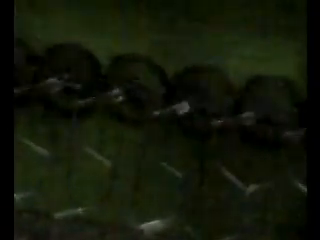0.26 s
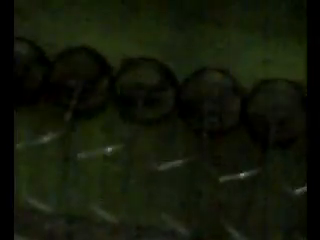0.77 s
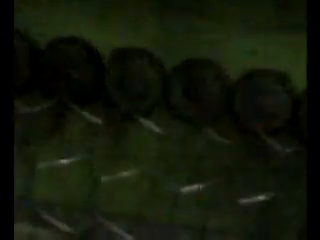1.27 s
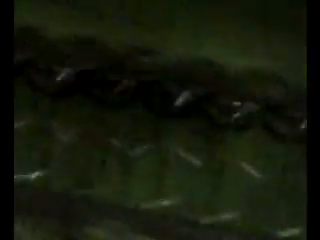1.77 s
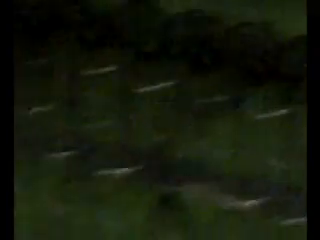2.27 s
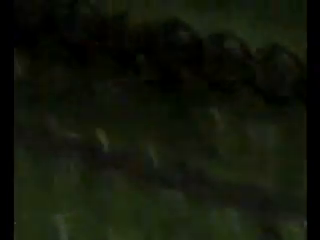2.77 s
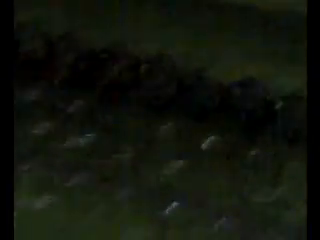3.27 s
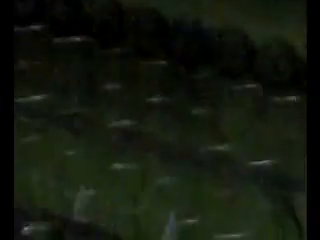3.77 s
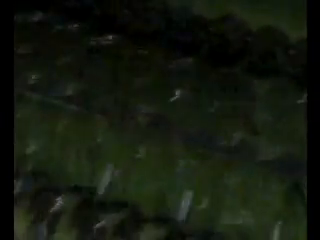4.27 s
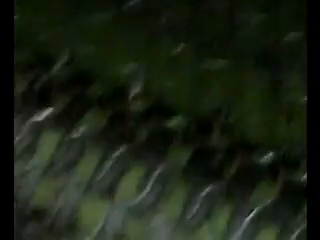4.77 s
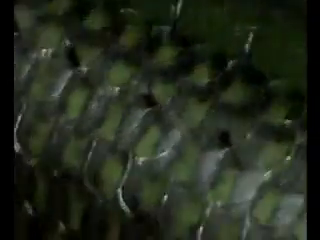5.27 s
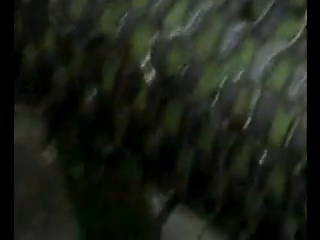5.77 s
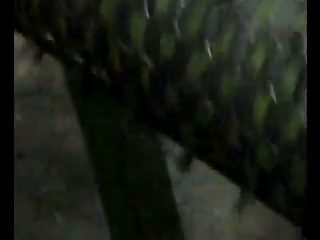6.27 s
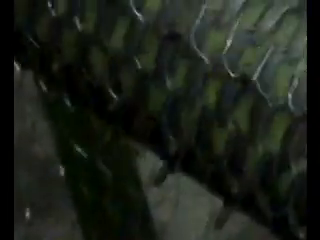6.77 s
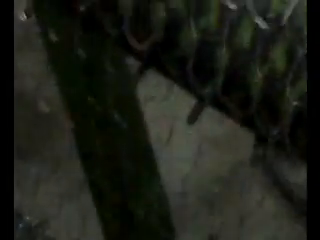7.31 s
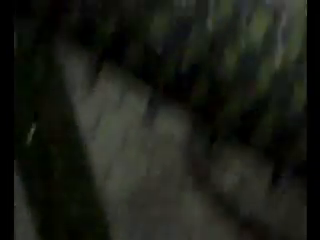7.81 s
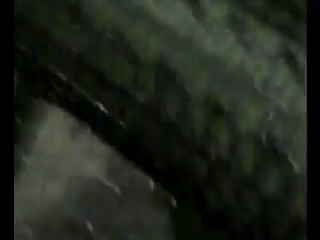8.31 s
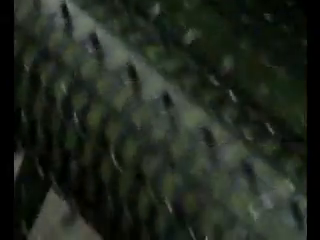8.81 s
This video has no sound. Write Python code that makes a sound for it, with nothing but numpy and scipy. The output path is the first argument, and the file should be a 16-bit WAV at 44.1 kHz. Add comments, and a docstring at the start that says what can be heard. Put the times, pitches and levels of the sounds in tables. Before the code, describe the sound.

Wire coils rattle steadily in steel tubes as a mesh-making machine clanks, rumbles and snaps in a regular cycle.

```python
"""A factory hall, close to a wire netting machine, heard through a small mono microphone.
Hundreds of wire coils rattle in their steel tubes, and thin wires tick against their guides.
About every 0.8 s the twisting racks clank against their stop, the slide bars rumble across,
and the fresh mesh snaps off its pegs. Underneath, the shaft hums and the gears whine.
The rattle and the blows echo briefly in the hall."""
import sys
import numpy as np
from scipy import signal
from scipy.fft import rfft, irfft, next_fast_len
from scipy.io import wavfile
from scipy.ndimage import uniform_filter1d

SR = 44100
rng = np.random.default_rng(int(sys.argv[2]) if len(sys.argv) > 2 else 0)


def digitize_waveform(pressure):
    """Quantize a signal to 16-bit integers and store it at the path in sys.argv[1].

    Rows of a 2-D input are taken as channels; values are limited to [-1, 1].
    """
    field = np.atleast_2d(pressure).T
    bounded = np.clip(field, -1, 1)
    quanta = np.round(bounded * 32767).astype(np.int16)
    wavfile.write(sys.argv[1], SR, quanta)


N = 399105
TIME = np.arange(N) / SR


def gain_of(db):
    """Turns decibels into a number to multiply by."""
    return 10 ** (np.asarray(db) / 20)


def unit_rms(x):
    """Scales a signal to an average power of 1."""
    return x / np.sqrt(np.mean(x ** 2) + 1e-20)


def value_at(points, hz):
    """Looks up a value between (Hz, value) rows, on a logarithmic pitch scale."""
    row_hz, value = np.transpose(points)
    return np.interp(np.log(hz + 1), np.log(row_hz + 1), value)


def level_curve(rows, column):
    """Turns one dB column of a timed table into a gain for every sample."""
    rows = np.asarray(rows)
    return gain_of(np.interp(TIME, rows[:, 0], rows[:, column]))


def add(mix, start_s, sound):
    """Mixes a sound in, cutting off whatever falls outside the mix."""
    start = round(start_s * SR)
    sound = sound[max(-start, 0):]
    part = mix[max(start, 0):][:len(sound)]
    part += sound[:len(part)]


def colour(x, spectrum):
    """Makes some pitches stronger and others weaker; the result has power 1."""
    size = next_fast_len(len(x))
    gains = gain_of(value_at(spectrum, np.fft.rfftfreq(size, 1 / SR)))
    return unit_rms(irfft(rfft(x, size) * gains, size)[:len(x)])


def ring(x, hz, width_hz):
    """Lets x set one note ringing; a narrower width rings longer."""
    r = np.exp(-np.pi * abs(width_hz) / SR)
    feedback = [1, -2 * r * np.cos(2 * np.pi * hz / SR), r * r]
    return np.sqrt((1 - r * r) / 2) * signal.lfilter([1, 0, -1], feedback, x)


def contacts(length, per_s, spread_db):
    """Clicks of random size and sign at random moments, with power 1."""
    size = gain_of(spread_db * np.clip(rng.standard_normal(length), -2, 2))
    sign = rng.choice([-1, 1], length)
    return unit_rms(size * sign * (rng.random(length) < per_s / SR))


def ticks(low_hz, high_hz, spread_db, width_hz, count):
    """Small steel parts are tapped at random; each rings briefly at its own pitch."""
    when, pitch, force, phase = rng.random((count, 4)).T[:, :, None]
    age = np.arange(SR // 160)
    hz = low_hz + (high_hz - low_hz) * pitch
    waves = np.sin((2 * np.pi * (hz * age / SR + phase)).astype(np.float32))
    rings = gain_of(spread_db * force) * waves * np.exp(-np.pi * width_hz * age / SR)
    positions = (when * N).astype(int) + age
    return np.bincount(positions.ravel(), rings.ravel())[:N]


def tone(hz, width_hz, length):
    """A held note with power 1; more width makes it less steady."""
    drift = np.sqrt(2 * np.pi * abs(width_hz) / SR) * rng.standard_normal(length)
    return np.sqrt(2) * np.sin(np.cumsum(2 * np.pi * hz / SR + uniform_filter1d(drift, size=600)))


def waver(depth_db, rate_hz):
    """A gain that drifts at random, up to rate_hz times a second."""
    t = np.arange(0, N / SR + .01, .005)
    rates = rate_hz * np.geomspace(1 / 10, 1, num=20)
    drift = sum(np.sin(2 * np.pi * (hz * t + rng.random())) for hz in rates)
    return gain_of(depth_db * np.interp(TIME, t, unit_rms(drift)))


def swell(t, peak_s):
    """Rises to 1 at peak_s, then dies away."""
    return t / peak_s * np.exp(1 - t / peak_s)


# The microphone wanders along the machine.
# Each row: time in seconds, level of the tubes in dB, level of the thin wires in dB.
NEARNESS = [(0.0, -16.5, -21.5), (0.7, -18, -22.5), (1.55, -18, -23), (2.1, -16.5, -21.5),
            (2.9, -16, -19.5), (3.7, -17.5, -23), (4.6, -16.5, -21), (5.7, -17.5, -22), (6.7, -16.5, -20),
            (7.3, -17, -22), (7.6, -14, -17), (8.2, -14, -19), (9.05, -14, -18)]
# The tone colour of the tubes. Each row: pitch in Hz, strength in dB.
TUBE_COLOUR = [(300, -19), (550, -9), (700, -6), (950, -4), (1450, -3.5), (1850, -3.5), (2250, -4),
               (2500, -3.5), (3000, -9), (4000, -11), (6000, -23)]
# The notes the tubes share. Each row: pitch in Hz, width in Hz, level in dB.
TUBE_NOTES = [(1685, 30, -18), (1642, 47, -19), (1755, 70, -21.5), (1986, 160, -13.5)]


def tube_rattle(clatter_db=-3, notes_db=-1):
    """Coils knock inside their steel tubes, which ring at a few strong notes."""
    taps = colour(ticks(307, 3772, spread_db=2.5, width_hz=146, count=52000), TUBE_COLOUR)
    notes = sum(gain_of(db) * unit_rms(ring(taps, hz, width)) for hz, width, db in TUBE_NOTES)
    clatter = gain_of(clatter_db) * unit_rms(taps + gain_of(notes_db) * notes)
    return level_curve(NEARNESS, 1) * shaking(clank_db=1.4, slide_share=0.54, snap_db=-0.2) * clatter


# The bright tone colour of thin wire. Each row: pitch in Hz, strength in dB.
WIRE_COLOUR = [(1500, -19.5), (2600, 2.5), (3300, 1), (3800, 1.5), (4400, 3.5), (5000, 1.5), (5600, 0),
               (6000, -2), (6400, -3.5), (6700, -15), (7000, -33.5)]


def wire_ticks(wire_db=-3, click_db=-9):
    """Thin wires tick against the guides; where they cross, they click sharply."""
    taps = colour(ticks(2136, 6900, spread_db=1.5, width_hz=370, count=44000), WIRE_COLOUR)
    clicks = colour(contacts(N, per_s=1500, spread_db=1.5), WIRE_COLOUR)
    ticking = gain_of(wire_db) * unit_rms(taps + gain_of(click_db) * clicks)
    return level_curve(NEARNESS, 2) * shaking(clank_db=0.6, slide_share=0.7, snap_db=1.5) * ticking


def shaking(clank_db, slide_share, snap_db):
    """How hard the wire shakes: it changes briefly at each clank and snap, and while the bars slide."""
    change_db, t = np.zeros(N), np.arange(SR) / SR
    for start, *_ in RACK_CLANKS:
        add(change_db, start, clank_db * swell(t, peak_s=0.05))
    for start, _, _, shake_db, travel_s, *_ in BAR_SLIDES:
        add(change_db, start, slide_share * shake_db * slide_load(t, travel_s))
    for start, *_ in MESH_SNAPS:
        add(change_db, start, snap_db * swell(t, peak_s=0.023))
    return gain_of(change_db)


# The racks hit their stop. Each row: start in seconds, level of the gears in dB, ringing pitch in Hz,
# time the gears take to land in seconds, then five levels in dB: first blow, wire jangle,
# ringing bar, hollow note of the stop (added to stop_base_db), after-rattle.
RACK_CLANKS = [(0.305, -8.5, 1944, 0.026, -8.5, -31.5, -29.5, -13, -29),
               (1.090, -10, 1936, 0.015, -0.5, -21.5, -26.5, -17.5, -25),
               (1.893, -12, 1987, .033, -5.5, -32.5, -28, -11.5, -30),
               (2.685, -11, 1980, .024, -1, -21, -19, -18.5, -26.5),
               (3.488, -11, 2005, 0.053, -9, -29, -29, -8.5, -34),
               (4.281, -16.5, 1890, 0.042, -9, -21, -24.5, -13, -22.5),
               (5.079, -12.5, 2030, 0.037, -11, -26, -25.5, -18, -31.5),
               (5.864, -11.5, 1950, 0.044, -6.5, -24, -27.5, -14, -23.5),
               (6.665, -13.5, 2035, 0.041, -7.5, -26.5, -22.5, -21, -28),
               (7.455, -14.5, 2030, .04, -6.5, -18.5, -28.5, -17, -21.5),
               (8.245, -10.5, 2060, 0.04, -12, -25, -28.5, -16.5, -27.5),
               (9.028, -5, 2000, 0.021, -4, -17.5, -22, -22, -24)]
# The other notes in every clank. Each row: pitch in Hz, width in Hz, level in dB.
RACK_NOTES = [(950, 170, -10), (1240, 220, -6.5), (1710, 120, -8), (2480, 540, -7.5), (2900, 330, -6),
              (4080, 1200, -9)]


def rack_clanks(ring_width_hz=170, stop_hz=795.6, stop_base_db=-11.5, bar_fade_s=0.066):
    """One hard blow, then gears land in a scatter and rattle on; stop and bar ring, wires jangle."""
    out, t = np.zeros(N), np.arange(SR // 2) / SR
    for start, gears_db, hz, land_s, blow_db, jangle_db, bar_db, stop_db, rattle_db in RACK_CLANKS:
        blow, gears = np.zeros((2, len(t)))
        for note_hz, width, db in [(hz, ring_width_hz, 0)] + RACK_NOTES:
            blow += gain_of(db) * np.sin(2 * np.pi * note_hz * t) * np.exp(-np.pi * width * t)
            gears += gain_of(db) * ring(contacts(len(t), per_s=4000, spread_db=-3), note_hz, width)
        shake = contacts(len(t), per_s=3200, spread_db=7)
        jangle = unit_rms(colour(shake, WIRE_COLOUR) + gain_of(-3) * ring(shake, hz=4400, width_hz=550))
        bar = tone(hz, width_hz=40, length=len(t))
        stop = tone(stop_hz, width_hz=91, length=len(t))
        rattle = unit_rms(ring(contacts(len(t), per_s=640, spread_db=-0.5), hz, width_hz=600))
        add(out, start, gain_of(blow_db) * blow)
        add(out, start, gain_of(gears_db) * unit_rms(gears) * np.exp(-t / land_s))
        add(out, start, gain_of(jangle_db) * jangle * swell(t, peak_s=0.037))
        add(out, start, gain_of(bar_db) * bar * np.exp(-t / bar_fade_s))
        add(out, start, gain_of(stop_base_db + stop_db) * stop * swell(t, peak_s=0.012))
        add(out, start, gain_of(rattle_db) * rattle * swell(t, peak_s=0.1))
    return out


# The mesh leaves its pegs. Each row: start in seconds, first ping's relative level in dB, pitch in Hz,
# tick's relative level in dB, wait for the second wire in seconds, that wire's relative level in dB.
MESH_SNAPS = [(.063, -19, 5500, -23, .004, -19.5), (.856, -17.5, 5400, -12.5, 0.0039, -23),
              (1.647, -21, 5380, -14, .002, -16), (2.434, -16.5, 5480, -12, .004, -22),
              (3.2263, -10, 5340, -12.5, .007, -21), (4.041, -22, 5350, -14, .003, -17),
              (4.814, -15.5, 5500, -10.5, 0.0028, -17), (5.598, -13, 5420, -12.5, .002, -16.5),
              (6.4053, -14, 5240, -8.5, 0.0041, -16.5), (7.1849, -10.5, 5180, 2, 0.0039, -15.5),
              (7.9913, -9, 5360, -1.5, .008, -18), (8.7742, -7.5, 5100, -9, 0.0046, -17)]


def mesh_snaps(ping_db=4, ping_lag_s=0.00042, tick_hz=3900):
    """A taut wire scrapes off its peg with a dry tick and pings; a second wire follows at once."""
    out, t = np.zeros(N), np.arange(SR // 50) / SR

    def tick(hz):
        """A tiny burst of scraping noise."""
        scrape = ring(rng.choice([-1., 1.], len(t)), hz, width_hz=1800)
        return unit_rms(scrape) * swell(t, peak_s=0.00047)

    for start, first_db, hz, tick_db, wait_s, second_db in MESH_SNAPS:
        ping = gain_of(ping_db) * swell(t, peak_s=0.00054) * np.sin(2 * np.pi * hz * t)
        add(out, start, gain_of(tick_db - 3) * tick(tick_hz))
        add(out, start + ping_lag_s, gain_of(first_db) * ping)
        add(out, start + ping_lag_s + wait_s, gain_of(second_db) * (ping + gain_of(-4) * tick(hz)))
    return out


# The bars slide across. Each row: start in seconds, opening knock in dB, relative rumble level in dB,
# extra shaking in dB (tubes and wires each take a share), travel time in seconds,
# boom pitch in Hz, boom level against the rumble in dB.
BAR_SLIDES = [(-.27, -23, -22, -2, 0.32, 299, -7.5), (0.525, -23.5, -25.5, 1.6, 0.3, 275, -5),
              (1.31, -30.5, -27, 0.8, 0.2, 291, -6.5), (2.11, -21, -23.5, 1.5, .34, 260, -6),
              (2.9, -30, -26, 0.5, 0.38, 279, -4), (3.699, -24.5, -26.5, 0.9, .28, 337, -13),
              (4.51, -21.5, -24.5, 1, 0.3, 310, -1), (5.275, -27, -23, 2.5, 0.36, 342, -3),
              (6.11, -24.5, -22.5, 0.5, .34, 322, -2.5), (6.86, -20.5, -21, 4, 0.41, 392, -6.5),
              (7.69, -20, -22, 1, 0.36, 315, 2), (8.46, -19.5, -20, 1.2, .42, 380, -5.5)]
# The dull tone colour of the frame. Each row: pitch in Hz, strength in dB.
FRAME_COLOUR = [(60, -14), (140, -7.5), (200, -2), (300, -2.5), (380, 0), (470, 1), (560, 0.5), (700, -8),
                (1200, -14.5)]


def slide_bars(idle_db=-25.5, knock_fade_s=0.077):
    """Heavy bars start with a dull knock, grind in their guides and make the frame rumble and boom."""
    out, t = gain_of(idle_db) * frame_judder(N), np.arange(SR) / SR
    for start, knock_db, db, _, travel_s, boom_hz, boom_db in BAR_SLIDES:
        blows = contacts(len(t), per_s=1400, spread_db=-2)
        knock = colour(blows, FRAME_COLOUR) + gain_of(-4) * ring(blows, hz=1200, width_hz=700)
        boom = rubbing(len(t), boom_hz, width_hz=110, per_s=2500, spread_db=1.5)
        rumble = unit_rms(frame_judder(len(t)) + gain_of(boom_db) * boom)
        grind = rubbing(len(t), hz=540, width_hz=260, per_s=700, spread_db=1)
        load = slide_load(t, travel_s)
        add(out, start, gain_of(knock_db) * knock * np.exp(-t / knock_fade_s))
        add(out, start, gain_of(db - 0.5) * load * rumble)
        add(out, start, gain_of(db - 5.5) * load * grind * swell(t, peak_s=0.15))
    return out


def slide_load(t, travel_s, rise_s=0.015, release_s=0.081, sag_db_per_s=-6):
    """The load on the frame rises as the bars start, sags while they slide and drops when they stop."""
    release = np.exp(-np.maximum(t - travel_s, 0) / release_s)
    return np.minimum(t / rise_s, 1) * gain_of(sag_db_per_s * t) * release


def rubbing(length, hz, width_hz, per_s, spread_db):
    """Many tiny bumps of sliding steel blur into one rough note."""
    bumps = contacts(length, per_s, spread_db)
    return unit_rms(ring(ring(bumps, hz, width_hz), hz, 2 * width_hz))


# The frame's low notes. Each row: pitch in Hz, width in Hz, level in dB.
FRAME_NOTES = [(200, 60, -13.5), (277, 50, -11)]


def frame_judder(length):
    """Sliding steel shakes the frame and sets its low notes ringing."""
    shake = colour(contacts(length, per_s=2500, spread_db=1.5), FRAME_COLOUR)
    notes = sum(gain_of(db) * unit_rms(ring(shake, hz, width)) for hz, width, db in FRAME_NOTES)
    return unit_rms(shake + notes)


# Single hard knocks in the tubes. Each row: start in seconds, relative level in dB, pitch in Hz.
COIL_KNOCKS = [(0.252, -10.5, 2460), (1.194, -13, 1940), (1.261, -12, 1314), (1.378, -11, 1330),
               (1.943, -13.5, 1950), (2.135, -13, 1200), (2.221, -12, 1044), (2.265, -11.5, 1750),
               (3.024, -9.5, 2260), (3.167, -13, 984), (3.44, -8.5, 1880), (3.699, -8, 1724),
               (3.857, -14.5, 1050), (3.92, -16, 1890), (4.412, -13, 1950), (4.445, -11.5, 2005),
               (4.543, -9, 1836), (5.097, -5, 2105), (5.346, -10, 1840), (5.395, -11.5, 1086),
               (6.047, -10, 1890), (6.1, -9.5, 1930), (6.404, -11.5, 1100), (6.861, -10.5, 1990),
               (6.894, -11.5, 1006), (7.012, -12.5, 1050), (7.483, -3, 1965), (7.617, -9, 1955),
               (7.706, -11.5, 1043), (8.473, -3.5, 1770)]


def coil_knocks(knock_db=-3, fade_s=0.0084):
    """Now and then one coil slaps its tube and chatters to rest."""
    out, t = np.zeros(N), np.arange(SR // 12) / SR
    for start, db, hz in COIL_KNOCKS:
        chatter = unit_rms(ring(contacts(len(t), per_s=2400, spread_db=1), hz, width_hz=550))
        add(out, start, gain_of(db + knock_db) * chatter * np.exp(-t / fade_s))
    return out


# Heavy thuds in the frame. Each row: start in seconds, level in dB, pitch in Hz.
FRAME_THUDS = [(2.115, -20.5, 308), (4.565, -17, 329), (7.725, -13.5, 332), (7.785, -18.5, 305),
               (8.66, -17.5, 393)]


def frame_thuds():
    """A bar catches and the frame gives a short, low note."""
    out, t = np.zeros(N), np.arange(SR // 5) / SR
    for start, db, hz in FRAME_THUDS:
        add(out, start, gain_of(db) * swell(t, peak_s=0.0071) * np.sin(2 * np.pi * hz * t))
    return out


# Two held notes of the tubes.
# Each row: time in seconds, upper note's pitch in Hz, its level in dB, lower note's level in dB.
TUBE_SONG = [(0, 1676, -33, -44), (1.4, 1678, -36, -36), (2.3, 1680, -30.5, -34), (3.1, 1667, -30, -35.5),
             (4, 1686, -38.5, -37.5), (5.3, 1666, -31.5, -38), (6.3, 1676, -33.5, -34.5),
             (7.4, 1682, -31.5, -33), (9.05, 1687, -31, -31.5)]


def tube_singing(lower_hz=1636, width_hz=22):
    """Rubbing coils keep two close notes of the tubes ringing; they waver and beat together."""
    times, upper_hz, *_ = np.transpose(TUBE_SONG)
    upper = level_curve(TUBE_SONG, 2) * tone(np.interp(TIME, times, upper_hz), width_hz, N)
    lower = level_curve(TUBE_SONG, 3) * tone(lower_hz, width_hz, N)
    return sum(unit_rms(waver(depth_db=3, rate_hz=20)) * note for note in (upper, lower))


# The main shaft's two tones. Each row: pitch in Hz, width in Hz, relative level in dB.
SHAFT_TONES = [(37.2, 3, -6), (75, 6, -10)]
# The tone colour of the drive's low roar. Each row: pitch in Hz, strength in dB.
ROAR_COLOUR = [(10, -22.5), (25, -18), (48, -5.5), (65, 3), (90, 0), (120, 2), (170, -5), (300, -19)]


def drive_hum(drive_db=-36, stroke_s=0.79, crest_s=1.3, swing_db=3):
    """The shaft hums in a low roar; its lowest tone swells once as the racks go out and back."""
    low, overtone = (gain_of(db) * tone(hz, width, N) for hz, width, db in SHAFT_TONES)
    swing = gain_of(swing_db * np.cos(np.pi * (TIME - crest_s) / stroke_s))
    hum = gain_of(-2) * swing * waver(depth_db=-3, rate_hz=2.7) * low + overtone
    roar = gain_of(3) * colour(rng.standard_normal(N), ROAR_COLOUR)
    nearness = unit_rms(level_curve(NEARNESS, 1)) ** 1.1  # gains 1.1 dB for each dB of the tubes
    return gain_of(drive_db) * nearness * (hum + roar)


# The four whines of motor and gears. Each row: pitch in Hz, width in Hz.
GEAR_TONES = [(352, 12), (585, 12), (1020, 5), (3932, 14)]
# The microphone moves past the gears. Each row: time in seconds, then each whine's level in dB.
GEAR_LEVELS = [(0, -38, -47, -47, -38), (1.1, -51.5, -42.5, -34, -40), (3.2, -45, -36, -43, -38.5),
               (4.9, -34.5, -47.5, -38.5, -36.5), (5.5, -40.5, -42.5, -34, -39.5),
               (7.2, -35, -51, -34.5, -34), (7.9, -32.5, -40, -32.5, -35), (9.05, -33, -48.5, -34, -41)]


def gear_whine():
    """The motor and gears whine, each note fluttering a little."""
    out = np.zeros(N)
    for column, (hz, width) in enumerate(GEAR_TONES, start=1):
        whine = level_curve(GEAR_LEVELS, column) * tone(hz, width, N)
        out += whine * unit_rms(waver(depth_db=3, rate_hz=14))
    return out


# How long the hall rings. Each row: pitch in Hz, seconds to fade by 60 dB.
ECHO_TIMES = [(100, 0.36), (1000, 0.13), (3000, 0.16), (7000, 0.14)]


def hall_echo(x):
    """The hall scatters sound into a blurred tail; each pitch fades at its own speed."""
    hz, t, bands = signal.stft(x, SR, nperseg=512, noverlap=384)
    kept_per_step = gain_of(-60 * t[1] / value_at(ECHO_TIMES, hz)) ** 2
    power = np.array([signal.lfilter([0, 0, 1 - kept], [1, -kept], abs(band) ** 2)
                      for kept, band in zip(kept_per_step, bands)])
    scatter = rng.standard_normal(bands.shape) + 1j * rng.standard_normal(bands.shape)
    _, tail = signal.istft(np.sqrt(power) * scatter, nperseg=512, noverlap=384)
    return np.std(x) * unit_rms(tail[:N])


def scene(rattle_echo_db=-5, blows_echo_db=-9):
    """The machine and its echo in the hall, alike in both channels."""
    rattle = tube_rattle() + wire_ticks()
    blows = rack_clanks() + mesh_snaps() + slide_bars() + frame_thuds() + coil_knocks()
    echo = hall_echo(gain_of(rattle_echo_db) * rattle + gain_of(blows_echo_db) * blows)
    mix = gain_of(-0.9) * (rattle + blows + echo) + tube_singing() + drive_hum() + gear_whine()
    return np.array([mix, mix])


# The microphone's weak treble. Each row: pitch in Hz, boost or cut in dB.
MIC_COLOUR = [(5600, 2.5), (6300, -1), (6600, -11), (7000, -9.5)]


def record(dry, overload=0.88, top_hz=7000):
    """A dull microphone softens the treble; the loudest peaks are flattened, then the highest treble is cut
    away."""
    response = gain_of(value_at(MIC_COLOUR, np.fft.rfftfreq(N, 1 / SR)))
    dull = irfft(rfft(dry) * response, N)
    clipped = np.clip(dull, -overload, overload)
    treble_cut = signal.firwin(255, top_hz, window=("kaiser", 8), fs=SR)
    return signal.oaconvolve(clipped, treble_cut[None], "same")


dry = scene()
out = record(dry)
digitize_waveform(out)
```